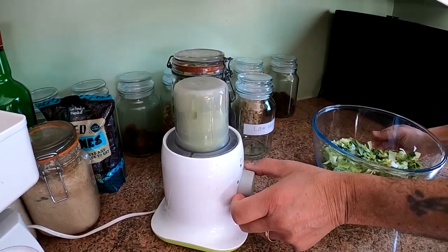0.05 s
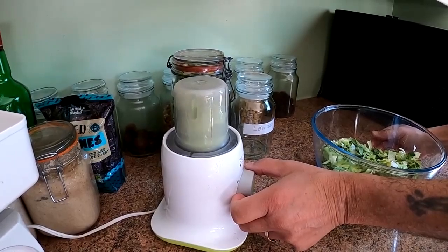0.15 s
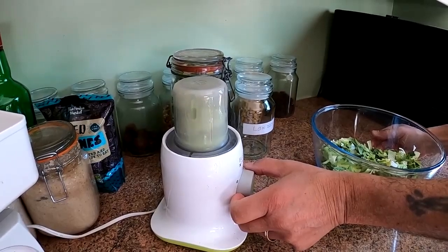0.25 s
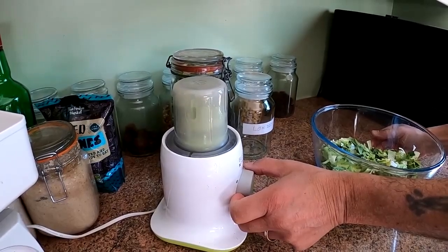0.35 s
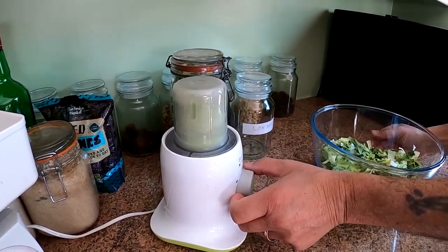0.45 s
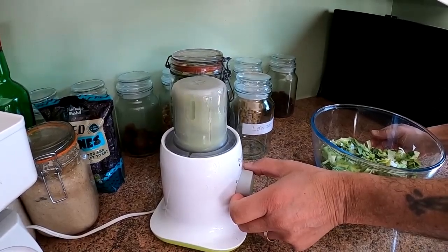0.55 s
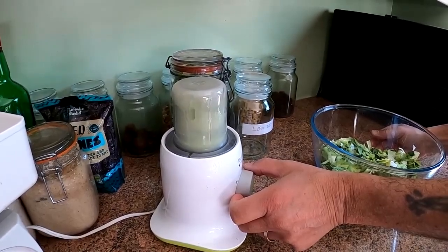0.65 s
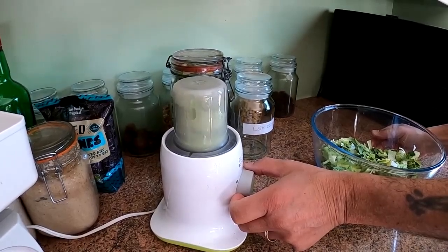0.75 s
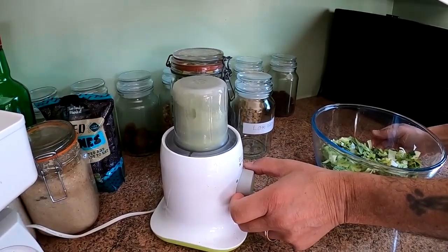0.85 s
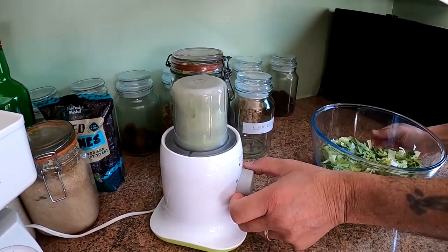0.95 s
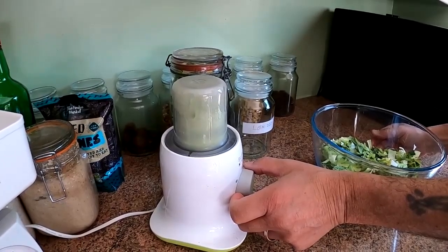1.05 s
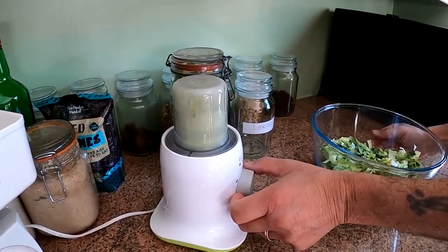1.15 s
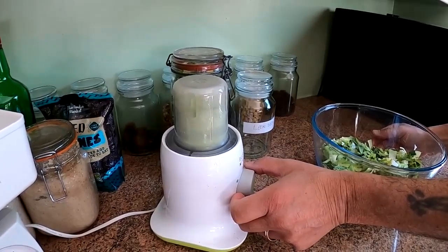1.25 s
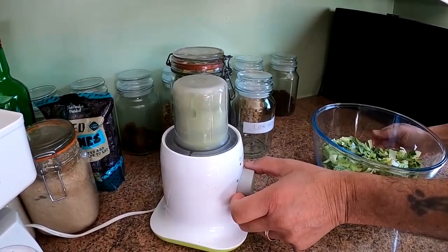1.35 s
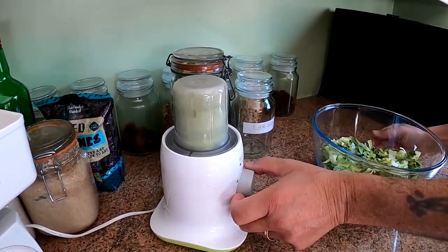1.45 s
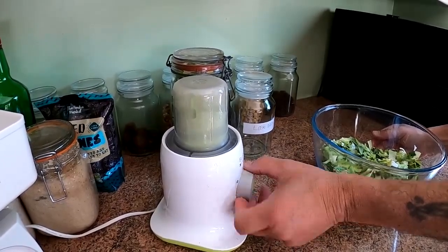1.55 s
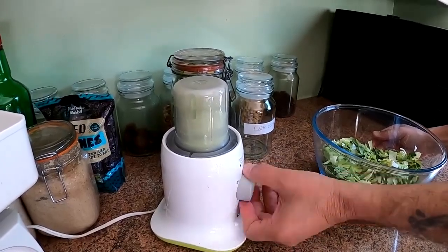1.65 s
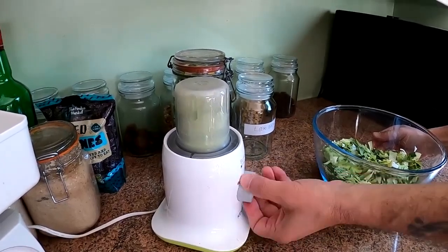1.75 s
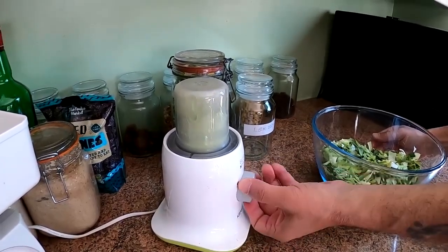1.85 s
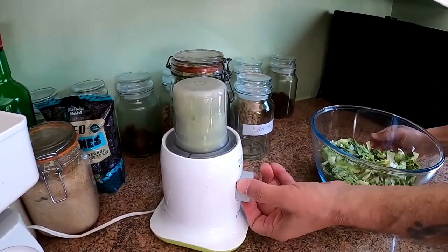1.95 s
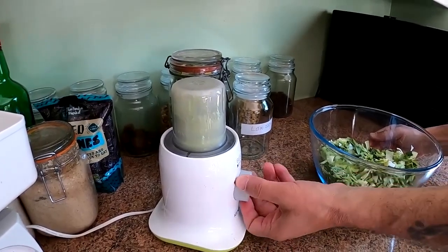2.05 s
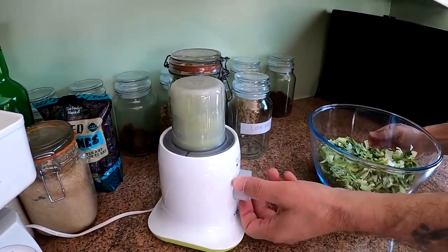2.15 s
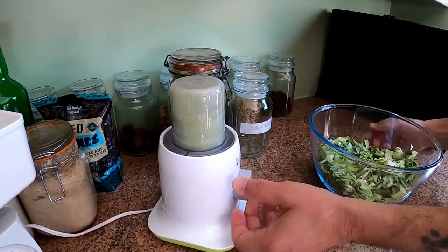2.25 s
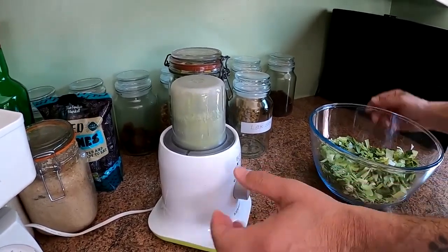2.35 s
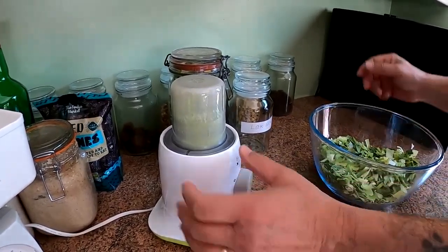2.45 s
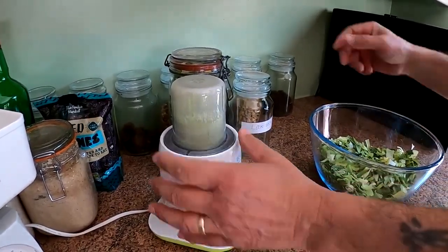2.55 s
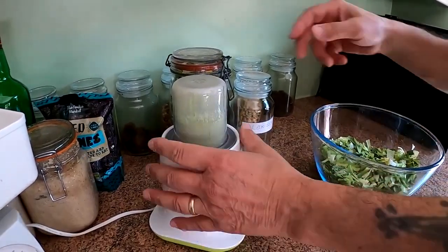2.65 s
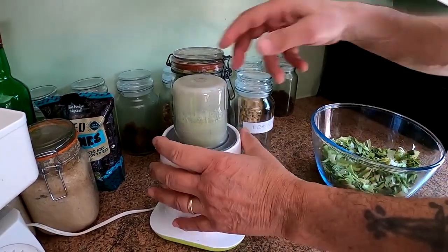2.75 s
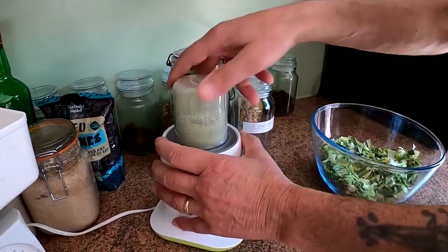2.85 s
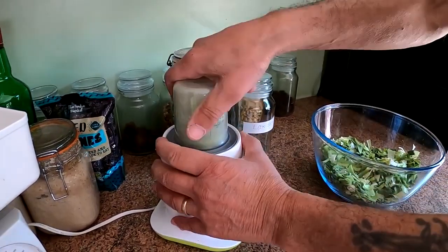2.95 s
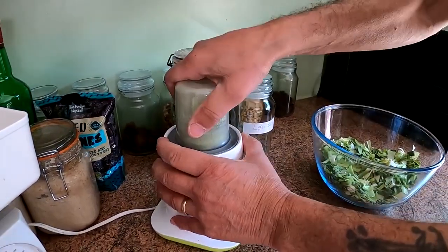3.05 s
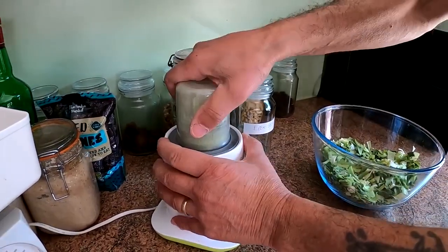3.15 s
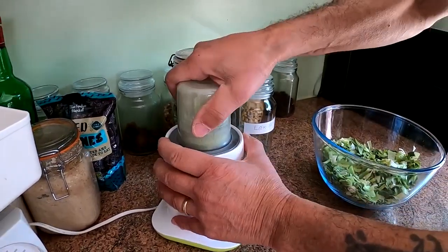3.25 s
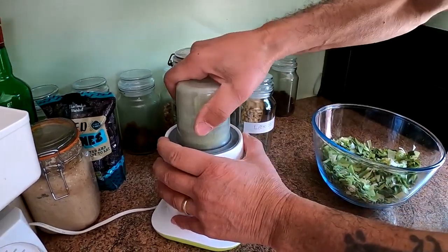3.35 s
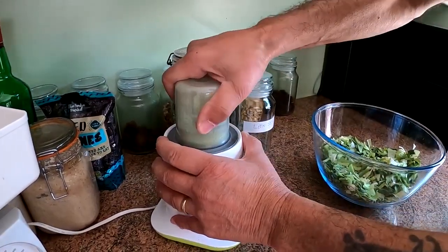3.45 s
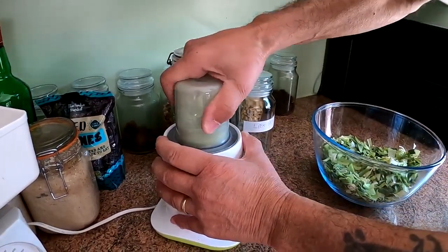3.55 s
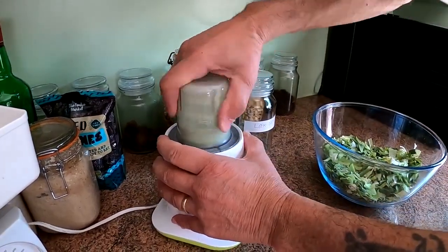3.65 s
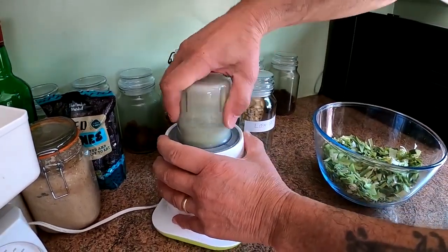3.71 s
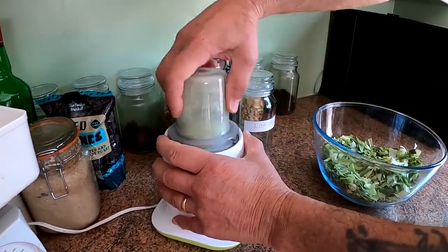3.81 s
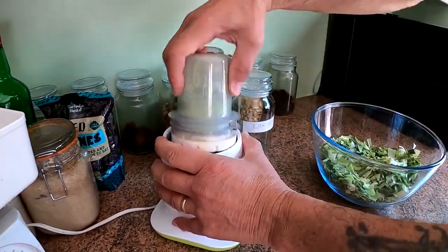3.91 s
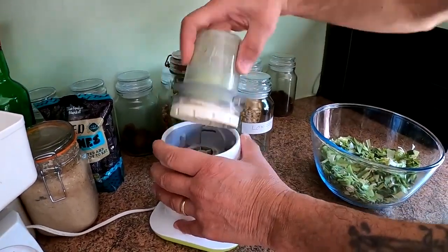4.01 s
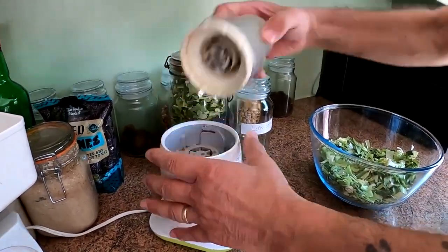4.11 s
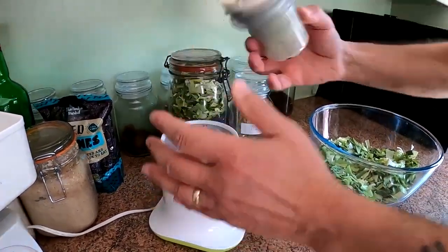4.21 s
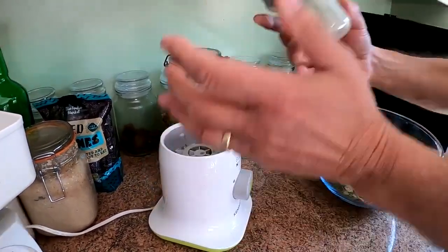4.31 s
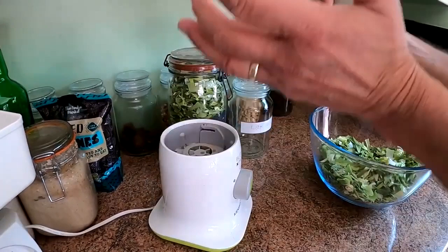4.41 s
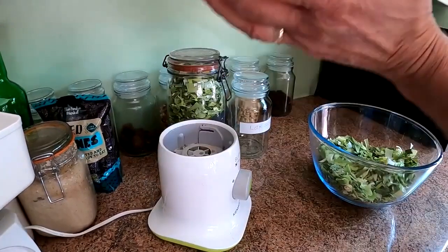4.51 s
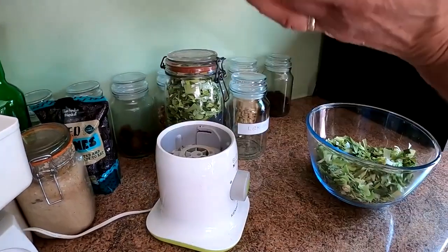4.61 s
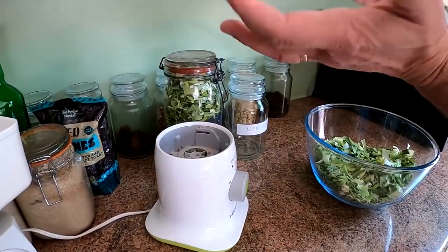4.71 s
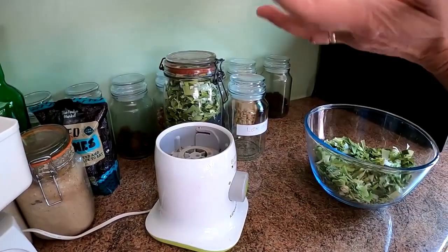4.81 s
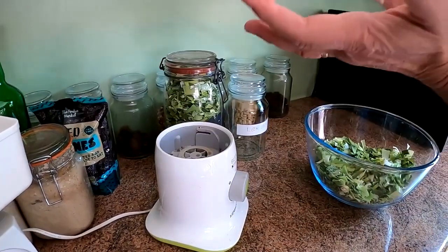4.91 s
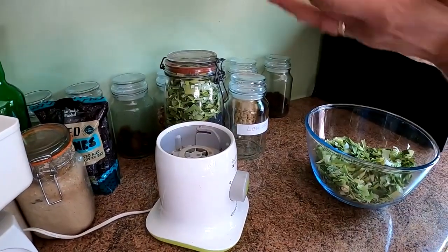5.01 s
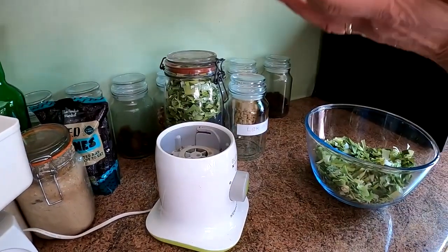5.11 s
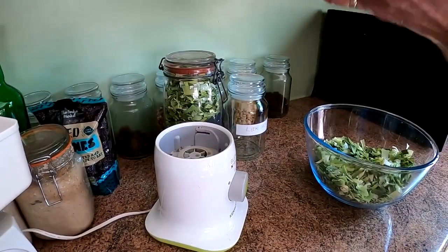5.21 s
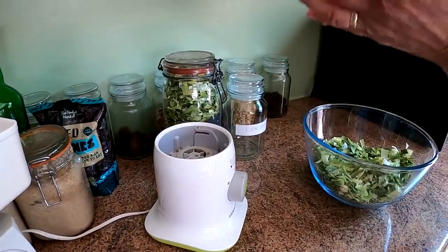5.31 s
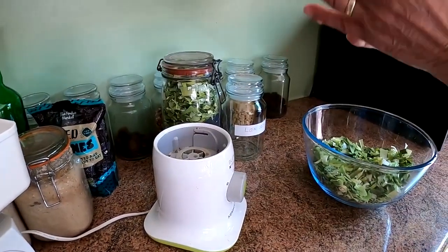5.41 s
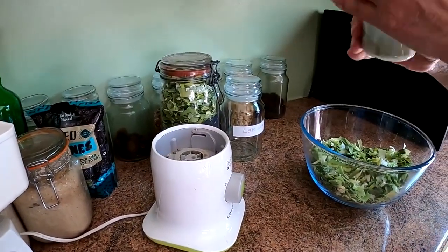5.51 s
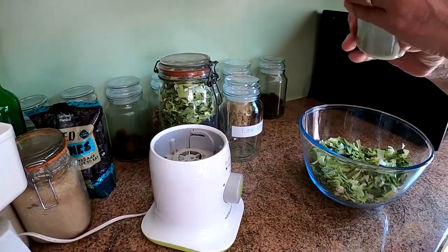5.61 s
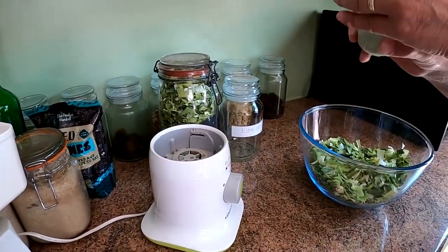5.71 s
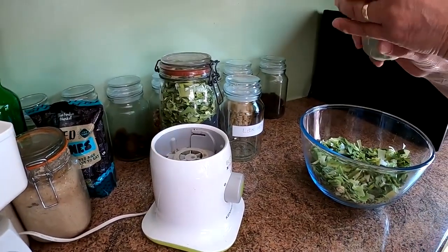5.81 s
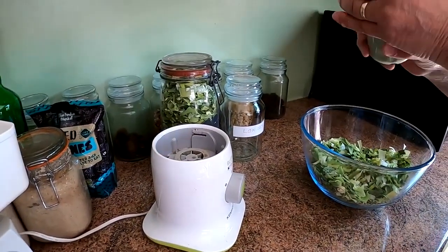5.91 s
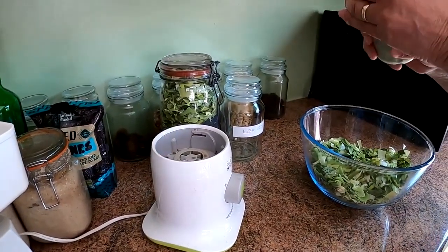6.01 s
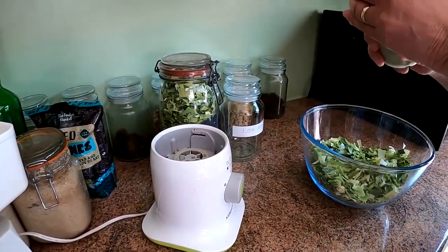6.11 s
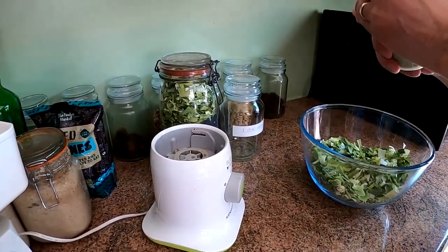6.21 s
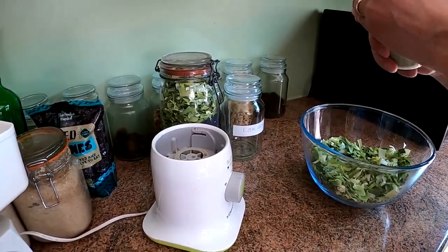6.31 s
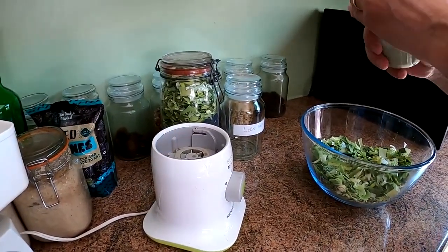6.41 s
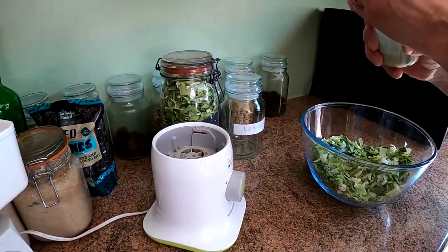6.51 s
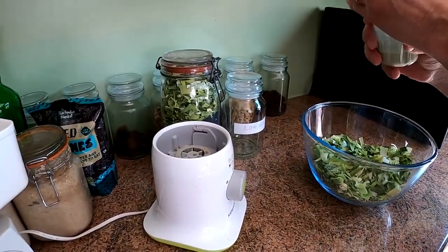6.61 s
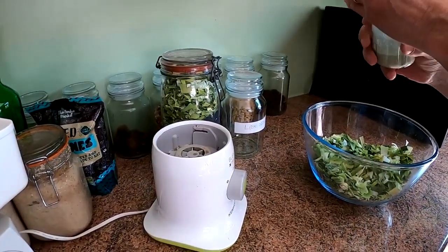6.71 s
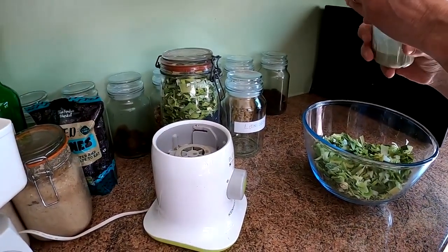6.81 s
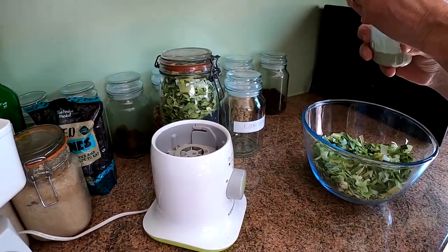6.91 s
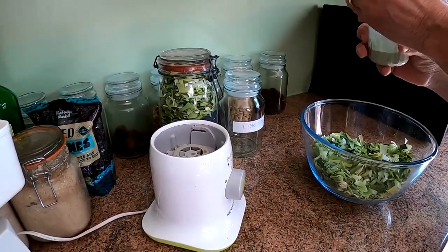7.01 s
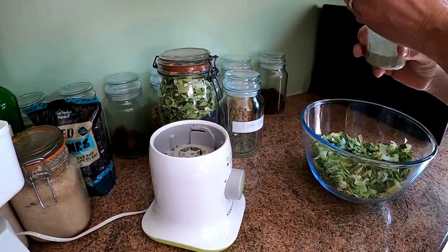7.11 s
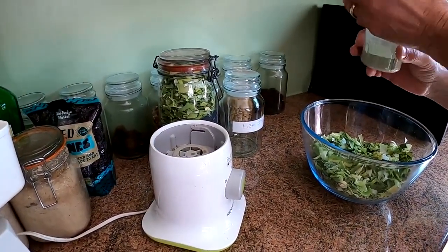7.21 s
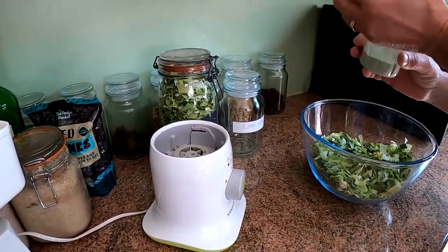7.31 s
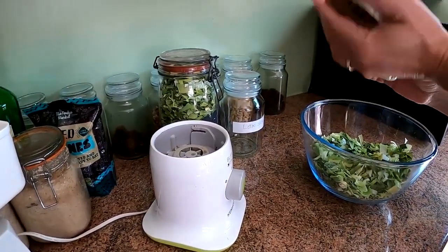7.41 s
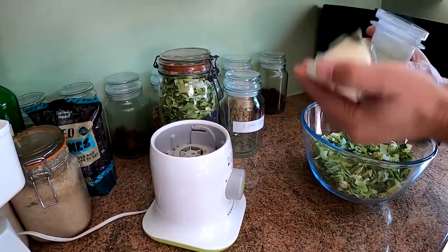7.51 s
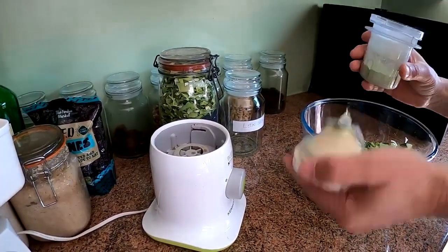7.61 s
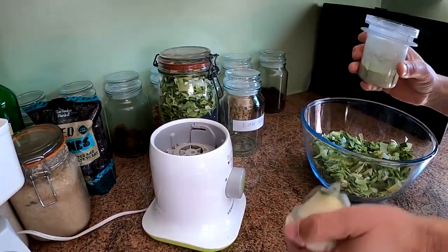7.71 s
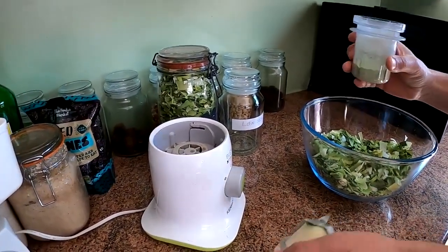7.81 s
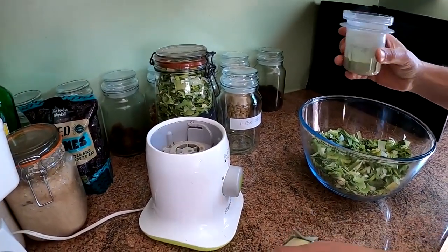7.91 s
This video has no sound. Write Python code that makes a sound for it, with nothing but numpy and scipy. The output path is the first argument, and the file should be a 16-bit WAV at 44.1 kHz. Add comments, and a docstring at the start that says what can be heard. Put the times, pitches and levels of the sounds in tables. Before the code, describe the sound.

A small grinder's harsh, buzzing whirr holds steady, then drops quickly through a fluttering, knocking coast to rest. Hands twist the plastic cup free with clunks, thuds and dragging scuffs. Four crisp, hollow slaps follow at an even pace, then a hard tick, loose lid knocks, one tiny squeak and a rattling pop. Close stereo microphone, short kitchen reflections, very quiet background.

```python
"""A small electric grinder on a kitchen counter runs, is switched off and coasts to rest.
Noise shaped by the housing makes its roar; sines that follow the shaft make its whine, tone and ticks.
Hands twist the plastic cup off the base, slap it against a palm, then unscrew its lid with one squeak.
Noise bursts ringing resonant bodies make the blows; swelling noise makes the scuffs and brushing."""
import sys
import numpy as np
from scipy import signal
from scipy.fft import rfft, irfft, next_fast_len
from scipy.io import wavfile
from scipy.ndimage import uniform_filter1d

SR = 44100
rng = np.random.default_rng(int(sys.argv[2]) if len(sys.argv) > 2 else 0)


def digitize_waveform(pressure):
    """Quantize a signal to 16-bit integers and store it at the path in sys.argv[1].

    Rows of a 2-D input are taken as channels; values are limited to [-1, 1].
    """
    field = np.atleast_2d(pressure).T
    bounded = np.clip(field, -1, 1)
    quanta = np.round(bounded * 32767).astype(np.int16)
    wavfile.write(sys.argv[1], SR, quanta)


N = 351036
TIME_S = np.arange(N) / SR


def amp(db):
    """Decibels to amplitude."""
    return 10 ** (np.asarray(db) / 20)


def even(x):
    """Scale to rms 1."""
    return x / np.sqrt(np.mean(x ** 2) + 1e-20)


def read(points, hz):
    """Read a curve of (Hz, value) points, straight along log frequency."""
    f, value = np.transpose(points)
    return np.interp(np.log(hz + 1), np.log(f + 1), value)


def columns(rows, x):
    """Read every later column along the first one."""
    first, *rest = np.transpose(rows)
    return [np.interp(x, first, column) for column in rest]


def resonance_db(modes, hz):
    """Sum of resonance humps in dB."""
    return sum(db / (1 + (2 * (hz - f) / width) ** 2) for f, width, db in modes)


def drift(cutoff_hz):
    """Slow random wandering of rms 1: lowpassed noise drawn at 400 knots a second."""
    knots = rng.standard_normal(int(N / SR * 400) + 2)
    smooth = signal.lfilter([1], [1, -np.exp(-2 * np.pi * cutoff_hz / 400)], knots)
    return even(np.interp(TIME_S * 400, np.arange(len(knots)), smooth))


def swells(rows):
    """Levels that climb to a peak and fall away at 23.5 dB per rise or fall time, added as powers."""
    power = 0
    for peak_s, db, rise, fall in rows:
        before = (peak_s - TIME_S) / max(rise, .003)
        after = (TIME_S - peak_s) / max(fall, .003)
        power = power + amp(2 * db - 47 * np.maximum(before, after))
    return np.sqrt(power)


# likeness of left and right: pitch_hz, likeness (1 = identical)
LIKENESS = [(60, 1), (180, 1), (500, 0.92), (930, 0.97), (1610, 0.87), (2790, .92), (4830, 1), (8350, 0.65),
            (10500, 0.16), (12500, 0.67), (14400, .8)]
# left against right: pitch_hz, level_db
SIDE_LEAN = [(60, 0.5), (130, 0), (290, -5.5), (630, 0.5), (1380, -2), (3020, 1), (6600, -2), (14400, 1)]


def coloured(envelope, field_db, size):
    """Stereo noise under an envelope, shaped by field_db(hz, s); every frame keeps its power."""
    noise = envelope * rng.standard_normal((2, N))
    hz, s, (a, b) = signal.stft(noise, SR, nperseg=size, noverlap=size * 3 // 4)
    same = np.clip(read(LIKENESS, hz), 0, 1)[:, None]
    half_lean = read(SIDE_LEAN, hz)[:, None] / 2
    gain = amp(field_db(hz[:, None], s))
    gain = gain / np.sqrt(np.mean(gain ** 2, 0))
    right = same * a + np.sqrt(1 - same ** 2) * b
    bins = np.array([a * amp(half_lean), right * amp(-half_lean)]) * gain
    return signal.istft(bins, SR, nperseg=size, noverlap=size * 3 // 4)[1][:, :N]


# how fast the room dies: pitch_hz, t60_s (time to fall 60 dB)
ROOM_T60 = [(100, 0.089), (300, 0.49), (900, 0.33), (2000, 0.37), (5000, 0.33), (8000, .26), (12000, 0.29)]
ROOM_PATCH_DB = 2.2  # rms; reflections come in uneven clumps
ROOM_LIKENESS, ROOM_BEND = 0.73, 1.216  # left-right likeness; above 1 a band holds before it dies


def kitchen(x):
    """Sparse reflections, one in every 20 samples; each band holds briefly, then dies at its own speed."""
    taps = np.zeros((2, SR // 2))
    slots = np.arange(400, SR // 2 - 20, 20)
    at = slots + rng.integers(0, 20, (2, (SR // 2 - 401) // 20))
    np.put_along_axis(taps, at, rng.choice([-1., 1.], at.shape), 1)
    taps[1] = ROOM_LIKENESS * taps[0] + np.sqrt(1 - ROOM_LIKENESS ** 2) * taps[1]
    hz, s, bins = signal.stft(taps, SR, nperseg=256)
    patches = uniform_filter1d(rng.standard_normal(bins.shape[1:]), size=4, axis=0)
    clumps = even(uniform_filter1d(patches, size=5, axis=1))
    fall_db = 60 * (s / read(ROOM_T60, hz)[:, None]) ** ROOM_BEND
    tail = signal.istft(bins * amp(ROOM_PATCH_DB * clumps - fall_db), SR, nperseg=256)[1]
    return signal.fftconvolve(x[None], tail / np.linalg.norm(tail[0]), axes=1)[:, :N]


# roar colour under power and coasting: pitch_hz, density_db (per Hz)
RUNNING_COLOUR = [(18, -69), (30, -45), (200, -13.5), (311, -21), (345, -17), (393, -9), (610, -8),
                  (856, -15.5), (1050, -3.5), (1770, -4.5), (1960, -2.5), (2550, 1.5), (11500, -27.5),
                  (13800, -46), (14900, -66.5)]
COASTING_COLOUR = [(18, -60), (30, -30), (113, -7.5), (150, -12.5), (732, -9), (856, -12.5), (1170, 0.5),
                   (2020, -15), (2900, -9.5), (3570, -10.5), (5410, -24), (9100, -30.5), (13100, -43.5),
                   (14900, -68.5)]
# plastic housing resonances: pitch_hz, width_hz, lift_db
HOUSING = [(105, 18, -3), (199, 68, 11), (636, 28, 6), (1060, 260, 2), (1588, 60, 10), (1756, 190, 7),
           (1960, 80, -4), (2190, 70, -5), (2535, 55, 6.5), (2794, 69, 4.5), (3300, 81, 2.5),
           (3592, 250, 6), (4270, 120, 4.5), (4940, 70, 4), (5600, 110, 5.5), (7700, 300, 0.5)]
# cup resonances that come out as the blade slows: pitch_hz, width_hz, lift_db
LOOSE_CUP = [(1070, 340, 9.5), (3300, 900, 2.5), (8400, 1900, 9.5)]
HOUSING_CALMS = 0.45  # share of the housing ring lost in coasting


def blade_roar(turns, coast, roar_db, loose_db):
    """Noise rings the housing; loose bits tumble in bursts with one throb each turn."""
    tumble = amp(loose_db * (drift(120) + .6 * np.cos(2 * np.pi * turns)))
    tumble = tumble / np.sqrt(uniform_filter1d(tumble ** 2, size=8192))

    def field_db(f, s):
        running, housing = read(RUNNING_COLOUR, f), resonance_db(HOUSING, f)
        coasting = read(COASTING_COLOUR, f) + resonance_db(LOOSE_CUP, f)
        slide = np.interp(s, TIME_S, coast).clip(0, 1.3)
        return running + housing + slide * (coasting - running - HOUSING_CALMS * housing)

    return amp(roar_db) * coloured(tumble, field_db, size=2048)


# blade knocking the housing once a turn: time_s, level_db
KNOCKS = [(0, -34.5), (1.7, -34), (2.0, -30.5), (2.3, -27), (2.45, -30), (2.6, -40), (2.9, -53.5),
          (3.2, -75)]
KNOCK_HZ, KNOCK_WIDTH_HZ = 3230, 1800  # centre and reach of the ring
KNOCK_JITTER_TURNS, KNOCK_SWING_DB = .03, 3  # unevenness in time and strength


def knocks(turns):
    """One click a turn, uneven in time and strength, rings the housing modes."""
    s = np.arange(2048) / SR
    uneven_turns = np.maximum.accumulate(turns + KNOCK_JITTER_TURNS * drift(150))
    clicks = np.diff(np.floor(uneven_turns), prepend=0)
    clicks = clicks * amp(KNOCK_SWING_DB * (0.66 * drift(25) + 0.77 * rng.standard_normal(N)))
    ring = 0
    for f, width, db in HOUSING:
        strength = amp(db) * np.sqrt(width) / (1 + (2 * (f - KNOCK_HZ) / KNOCK_WIDTH_HZ) ** 4)
        ring = ring + strength * np.exp(-np.pi * width * s) * np.sin(2 * np.pi * f * s)
    rung = signal.oaconvolve(uniform_filter1d(clicks, size=3), ring)[:N]
    level = amp(columns(KNOCKS, TIME_S)[0])
    return level * rung / np.sqrt(uniform_filter1d(rung ** 2, size=16384) + 1e-9)


# where the housing lets the brush ticks out: pitch_hz, width_hz, lift_db
TICK_PORTS = [(6100, 2400, 38), (8300, 1600, 27)]
TICKS_PER_TURN, TICK_DB = 10, -62  # level against the roar, before the port lift
TICK_HIDDEN_DB, TICK_CLEAR_HZ = -6, 115  # flying bits muffle the ticks until the shaft is slower than this


def brush_ticks(hz, turns, roar_db, loose_db):
    """Brushes tick on the commutator: in-phase harmonics of the tick rate, let out through the housing."""
    end = round(ROAR[-1][0] * SR)
    orders = TICKS_PER_TURN * np.arange(2, 20)[:, None]
    tick_hz = orders * hz[:end]
    levels = amp(TICK_DB + resonance_db(TICK_PORTS, tick_hz)) * (tick_hz < 12000)
    ticks = np.sum(levels * np.cos(2 * np.pi * orders * turns[:end]), 0)
    muffling_db = .5 + TICK_HIDDEN_DB / (1 + (TICK_CLEAR_HZ / hz) ** 8)
    return np.pad(ticks, (0, N - end)) * amp(muffling_db + roar_db + 1.5 * loose_db + 2.2 * drift(25))


def wobble(width_hz):
    """Phase of a wandering pitch, width_hz rms."""
    return 2 * np.pi * np.cumsum(width_hz * drift(12)) / SR


# powered whine: shaft_multiple (rounded for the pitch), level_db, wobble_hz
WHINE = [(2, -45.5, 6), (3, -34.5, 3.5), (4.03, -44, 10), (5, -35, 20), (6.01, -46, 15), (7, -44, 10),
         (8, -39.5, 12), (9, -44, 10), (10.01, -36.5, 14), (11, -45, 11), (12, -36, 5), (20, -52, 30),
         (40, -74, 14)]
# mains pull on the motor: shaft_multiple, offset_hz, level_db
BUZZ = [(0, 100, -53.5), (0, 197, -43), (1, -100, -47.5), (2, -100, -42.5), (3, -100, -41.5)]


def motor_whine(hz, turns, power, roar_db):
    """Shaft harmonics and mains buzz, each unsteady; the higher whines outlast the switch-off longer."""
    whine = 0
    for k, db, width in WHINE:
        ring_db = .5 * (resonance_db(LOOSE_CUP, k * hz) - resonance_db(LOOSE_CUP, k * RUN_HZ))
        tone = np.sin(2 * np.pi * round(k) * turns + wobble(width))
        whine = whine + amp(db + ring_db) * power ** (1 / k) * tone * amp(2.8 * drift(16))
    for k, offset_hz, db in BUZZ:
        tone = np.sin(2 * np.pi * (k * turns + offset_hz * TIME_S) + wobble(8))
        whine = whine + amp(db) * power * tone * amp(2.8 * drift(16))
    return np.sqrt(2) * amp(roar_db - roar_db[0]) * whine


TONE_DB, TONE_DB_PER_OCTAVE = -32, 10  # the shaft tone sinks with speed
TONE_CUT_HZ, TONE_CUT_POWER = 98, 12  # and fades steeply below the cut
OCTAVE_DB = -10  # second partial against the first, once coasting


def shaft_tone(hz, turns, coast, power):
    """A sine at the shaft speed, less steady in coasting, when its octave joins; a little louder on the right."""
    cut_db = 10 * np.log10(1 + (TONE_CUT_HZ / hz) ** TONE_CUT_POWER)
    tone_db = TONE_DB + TONE_DB_PER_OCTAVE * np.log2(hz / RUN_HZ) - cut_db
    first = amp(tone_db + (0.5 + 4.5 * coast) * drift(9.9)) * np.sin(2 * np.pi * turns + wobble(1.5))
    octave_level = amp(tone_db + OCTAVE_DB + 3.0 * drift(14)) * (1 - power)
    octave = octave_level * np.sin(4 * np.pi * turns + wobble(4.0))
    return np.sqrt(2) * (first + octave) * amp([[-1.], [1.]])


# shaft slowed by air drag and bearing friction: time_s, speed_hz (turns per second)
SPEED = [(0, 351.9), (1.68, 351.9), (1.8, 315), (1.9, 281), (2.0, 246), (2.15, 203), (2.3, 165), (2.4, 142),
         (2.53, 111.6), (2.65, 89.4), (2.85, 54.3), (3.2, 1)]
# blade roar: time_s, level_db
ROAR = [(0, -20), (1.7, -20), (2.2, -22.5), (2.42, -24), (2.55, -29.5), (2.94, -44), (3.02, -44.5),
        (3.2, -67), (3.26, -87), (3.3, -87)]
RUN_HZ, POWER_OFF_S = 351.9, 1.68
POWER_FADE_S = 2.2 / 14  # time constant of the buzz; a whine takes its shaft multiple times as long
COAST_RUNNING, COAST_GAIN, COAST_BEND = .12, 0.88, 1.4  # colour slides to coasting as speed is lost


def grinder():
    """One shaft speed drives blade roar, knocks, brush ticks, motor whine and shaft tone."""
    hz = uniform_filter1d(columns(SPEED, TIME_S)[0], size=2048)
    turns = np.cumsum(hz) / SR
    roar_db = columns(ROAR, TIME_S)[0]
    coast = COAST_RUNNING + COAST_GAIN * abs(1 - hz / RUN_HZ) ** COAST_BEND
    power = np.exp(-np.maximum(TIME_S - POWER_OFF_S, 0) / POWER_FADE_S)
    loose_db = 0.93 + 2.3 * (1 - hz / hz[0]) ** 2  # bursts stand apart as the blade slows
    alive = np.clip((ROAR[-1][0] - TIME_S) / 0.081, 0, 1)
    roar = blade_roar(turns, coast, roar_db, loose_db) + knocks(turns)
    roar = roar + amp(-9.5) * kitchen(roar.mean(0))
    ticks = brush_ticks(hz, turns, roar_db, loose_db)
    whine = motor_whine(hz, turns, power, roar_db)
    return alive * (roar + ticks + whine + shaft_tone(hz, turns, coast, power))


# hands brushing about: peak_s, level_db, rise_s, fall_s (per 23.5 dB)
BRUSHES = [(3.0, -53, 2, 0.22), (3.95, -57, .5, 0), (4.3, -67.5, 0.5, 0.5), (4.52, -61, 0.14, 0.02),
           (5.02, -61.5, 0.5, 0), (5.21, -63, 0.5, 0.5), (5.9, -64, .5, 1.1), (6.27, -54.5, -0.5, 0.1),
           (6.4, -72, 2.5, 0.5), (6.65, -53, -0.66, 0.18), (7.3, -68, .15, .5), (7.45, -68, .5, 0.1),
           (7.7, -70.5, .3, 1.2), (7.88, -62.5, 0.14, .12), (7.955, -56, .06, 2)]
# brushing hiss: pitch_hz, density_db (per Hz)
BRUSH_COLOUR = [(350, -39), (600, -8.5), (840, -13.5), (1270, -3), (1400, -7.5), (1580, -4.5), (7210, -5),
                (14900, -24)]
# low bumps through the counter: peak_s, level_db, rise_s, fall_s (per 23.5 dB)
BUMPS = [(3.0, -56.5, 2, 0.5), (3.9, -52, 0.5, 0.53), (4.3, -63.5, 0.5, 0.3), (4.92, -53, 0.2, 0.07),
         (5.21, -52, 0.2, -0.06), (6.57, -57, .03, 0.03)]
# counter rumble: pitch_hz, density_db (per Hz)
RUMBLE_COLOUR = [(12, -31), (20, -3.5), (40, -3.5), (98, -31.5), (138, -16), (171, -2.5), (266, -7),
                 (345, -15), (441, -19.5), (1000, -32), (1300, -60), (2200, -120)]
# thin airy hiss as the cup is lifted away: peak_s, level_db, rise_s, fall_s (per 23.5 dB)
CUP_LIFTS = [(4.13, -72.5, 0.13, .1), (4.24, -62, .1, .1), (4.34, -68.5, .15, .12)]
# band of that hiss: pitch_hz, width_hz, lift_db
CUP_LIFT_BAND = [(4020, 900, 22)]
HISS_DB, RUMBLE_DB = -84.5, -69  # the quiet kitchen
HANDS_PAN_DB = -3  # left against right


def hands():
    """Faint uneven hiss, low lumpy rumble and an airy lift: wandering noise under swells."""
    hiss = coloured(amp(0.85 * drift(30)), lambda f, s: read(BRUSH_COLOUR, f), size=512)
    rumble_db = lambda f, s: read(RUMBLE_COLOUR, f) - 60 * (f > 1000)
    rumble = coloured(amp(1.5 * drift(15)), rumble_db, size=2048)
    airy = coloured(amp(1.5 * drift(30)), lambda f, s: resonance_db(CUP_LIFT_BAND, f), size=512)
    mix = np.hypot(amp(HISS_DB), swells(BRUSHES)) * hiss
    mix = mix + np.hypot(amp(RUMBLE_DB), swells(BUMPS)) * rumble + swells(CUP_LIFTS) * airy
    return mix * amp([[HANDS_PAN_DB / 2], [-HANDS_PAN_DB / 2]])


# Every body below holds three parts. Colour: pitch_hz, level_db.
# Modes: pitch_hz, width_hz, lift_db. Thump: pitch_hz, t60_s.
# Every landing below: rise_s (0.0001 at least), thump_db against the peak, echo_db, left_right_db.
# The direct thump is doubled on top of its level.
GRIP_SHIFT = .012  # the grip moves the modes by this share (rms) from blow to blow


def minimum_phase(db):
    """Spectrum with the given level whose ring starts at once."""
    log_gain = np.log(amp(db))
    return np.exp(log_gain - 1j * signal.hilbert(log_gain).imag)


def blows(rows, body, landing, spread=.7):
    """A short scrape of noise rings the body, with a soft thump. Gives left, right and what the walls get."""
    colour, modes, (thump_hz, thump_t60) = body
    rise, thump_db, echo_db, pan_db = landing
    hz, t = abs(np.fft.fftfreq(8192, 1 / SR)), np.arange(8192) / SR
    out = np.zeros((3, N + 8192))
    for s, peak_db, tilt_db, contact in rows:
        grip, scrape = rng.standard_normal(), rng.standard_normal(8192)
        broad_db = read(colour, hz) + tilt_db * np.log2(np.maximum(hz, 1200) / 2000)
        ring_db = resonance_db(modes, hz * (1 + GRIP_SHIFT * grip))
        scrape = scrape * (1 - np.exp(-t / max(rise, .0001))) * amp(-60 * t / max(contact, .002))
        click = np.fft.ifft(np.fft.fft(scrape) * minimum_phase(broad_db + ring_db)).real
        # the loudest 2 ms sets the peak level
        click = amp(peak_db) * click / np.sqrt(uniform_filter1d(click ** 2, size=88).max())
        # summed over all directions, a spread below 1 makes the modes stand out less
        wide = np.fft.ifft(minimum_phase(broad_db + spread * ring_db)).real
        wide = wide * np.linalg.norm(click) / np.linalg.norm(wide)
        thump = amp(peak_db + thump_db - 60 * t / thump_t60) * np.sin(2 * np.pi * thump_hz * t)
        thump = thump * (1 - np.exp(-t / 0.00084))
        sound = np.array([click, click, wide]) + thump * [[2], [2], [.7]]
        at = round(s * SR)
        out[:, at:at + 8192] += sound * amp([[pan_db / 2], [-pan_db / 2], [echo_db]])
    return out[:, :N]


# hard bits hit by the slowing blade: start_s, peak_db, brightness_db (per octave), contact_s (60 dB fall)
RATTLES = [(2.287, -24, 2, .012), (2.42, -25, 1.5, .012), (2.452, -24.5, 2.5, .012), (2.51, -27.5, 2, .012),
           (2.553, -25, 1, 0.013), (2.583, -30, -6, 0.011), (2.677, -34, 0, .012),
           (2.905, -42.5, -0.5, .015), (2.984, -32.5, -4, .018), (3.065, -49, -6, .015),
           (3.115, -49, -10, .015), (3.17, -59, -6, 0.015)]
# body: the housing's shell
SHELL = ([(180, -40), (900, -13.5), (1100, -3.5), (2000, -6), (2800, -0.5), (4200, -8.5), (7000, -28),
          (14900, -59.5)], HOUSING, (148, .04))
# landing of a rattle
RATTLING = (-0.05, -39.5, -10.5, -1)


def rattles():
    """Hard bits knocked about by the blade ring the shell."""
    return blows(RATTLES, SHELL, RATTLING)


# cup twisted off the base: start_s, peak_db, brightness_db (per octave), contact_s (60 dB fall)
TWISTS = [(3.338, -51, -9, 0.02), (3.387, -53.5, -18, 0.027), (3.408, -51.5, -14, 0.015),
          (3.453, -52, -9, 0.024), (3.475, -47.5, -1, .032), (3.519, -36, -3.5, .029),
          (3.553, -53, -14.5, .02), (3.59, -57, -3, .018), (3.617, -43.5, 0, .044), (3.627, -31.5, 5, .04),
          (3.636, -30, 3.5, 0.05), (3.742, -44, 1, .04), (3.753, -24, 1, .039), (3.761, -23, -3.5, 0.028),
          (3.816, -26, -1.5, 0.025), (3.857, -41, -2, .05), (3.868, -40, -6, .04), (3.905, -40, -1, .05),
          (3.936, -30, -5, .016), (3.946, -34, -2, .03), (3.961, -28.5, -8, 0.035), (3.97, -25.5, 3, 0.026),
          (4.018, -41.5, -7, .026), (4.043, -53, -8, .02), (4.185, -37.5, 0.5, .022)]
# body: the base
BASE = ([(180, -10), (300, -2.5), (577, -10.5), (882, -13), (1110, -2), (2000, -8), (4230, -8),
         (8690, -20.5), (14900, -54)], [(1067, 220, 6.5), (1710, 180, 5), (2745, 550, 5.5),
         (4200, 440, 4.5)], (160, 0.25))
# landing of a twist
TWISTING = (0.1, -25.5, -12, -1.5)


def twists():
    """The cup is twisted off, each contact ringing the base."""
    return blows(TWISTS, BASE, TWISTING)


# soft thuds of plastic on plastic: start_s, level_db, pitch_hz
THUDS = [(3.756, -33.5, 257), (3.767, -30, 101.3), (3.8, -39.5, 105), (3.825, -37, 269.7),
         (3.874, -36, 102.7), (3.916, -32, 283.4), (3.921, -38, 100), (3.965, -35.5, 105),
         (4.021, -41.5, 294.4), (4.04, -41, 114.7), (4.189, -48.5, 258), (6.55, -33.5, 170.4)]
THUD_T60_S, THUD_RISE_S = 0.13, 0.0018


def thuds():
    """Short dying low tones."""
    t, out = np.arange(8192) / SR, np.zeros(N)
    for s, db, hz in THUDS:
        at = round(s * SR)
        envelope = amp(db - 60 * t / THUD_T60_S) * (1 - np.exp(-t / THUD_RISE_S))
        out[at:at + 8192] += envelope * np.sin(2 * np.pi * hz * t)
    return out


# cup dragged on its base: peak_s, level_db, fall_s (per 23.5 dB)
CUP_SCUFFS = [(3.763, -30, 0.06), (3.83, -39.5, 0.17), (3.87, -41, .1), (3.9, -37.5, 0.08),
              (3.928, -29, -0.02), (3.995, -43, -0.03), (4.04, -54, 0)]
# cup scuff: pitch_hz, density_db (per Hz)
CUP_SCUFF_COLOUR = [(24, -45.5), (40, -17.5), (98, 3.5), (135, -22.5), (266, 1), (430, -1), (600, -11.5),
                    (850, -15), (1100, -8.5), (1500, -10.5), (1950, -42.5), (3300, -120)]
# lid rattling on its thread: peak_s, level_db, fall_s (per 23.5 dB)
LID_SCUFFS = [(6.618, -36, 0.1), (6.66, -43, 0.08), (6.715, -47, 0.09), (6.745, -51, 0.07),
              (6.79, -50.5, 0.06), (6.81, -51.5, 0.09), (6.84, -57, 0.1)]
# lid scuff: pitch_hz, density_db (per Hz)
LID_SCUFF_COLOUR = [(40, -30), (100, -10), (210, -10.5), (290, -3.5), (380, -11), (450, 1), (580, -10),
                    (780, -5), (990, -15), (1330, -3), (1900, -15), (3300, -80)]
SCUFF_RISE_S = .012  # per 23.5 dB


def drag(rows, colour):
    """Bumpy coloured noise that swells with each drag."""
    level = swells([(s, db, SCUFF_RISE_S, fall) for s, db, fall in rows])
    return level * coloured(amp(2.4 * drift(48)) / 1.1, lambda f, s: read(colour, f), size=1024)


def scuffs():
    """Low scraping while plastic drags: the cup on its base, the lid on its thread."""
    return drag(CUP_SCUFFS, CUP_SCUFF_COLOUR) + drag(LID_SCUFFS, LID_SCUFF_COLOUR)


# dull palm touch before a slap: start_s, peak_db, brightness_db (per octave), contact_s (60 dB fall)
TOUCHES = [(4.688, -47.5, 0, 0.05), (4.892, -35.5, 0, 0.04), (5.097, -37, 0, 0.04),
           (5.357, -37, 0.5, 0.045)]
# body: the palm
PALM = ([(100, -30), (300, -14), (700, -5.5), (1300, 0.5), (1600, -19.5), (3000, -36), (14900, -80)],
         [(1200, 200, 3)], (150, 0.0399))
# cup slapped on a palm, with a small bounce: start_s, peak_db, brightness_db (per octave), contact_s
SLAPS = [(4.708, -41, -6.5, 0.014), (4.718, -33.5, -2.5, 0.021), (4.729, -10.5, -0.3, 0.019),
         (4.737, -24, -6, 0.022), (4.93, -42.5, -5, .02), (4.941, -10, -1.5, 0.019),
         (4.948, -23, -5.5, 0.02), (5.157, -12, -1.1, 0.023), (5.165, -25.5, -6, .025),
         (5.394, -18, 3.5, 0.021), (5.397, -15, -1.5, .022)]
# body: the cup
CUP = ([(180, -47.5), (300, -24.5), (567, -26), (942, -7), (1300, -4.5), (2000, -4), (3160, -7),
        (3840, -8.5), (7880, -23.5), (14900, -50.5)], [(1110, 150, 3), (1520, 100, 3), (1830, 170, 8.7),
        (2359, 320, 5), (2560, 150, 4), (2895, 200, 3), (3480, 280, 4.4), (3880, 130, 6), (4160, 160, 4.7),
        (5100, 150, 3.1)], (148, 0.034))
# landing of a touch or slap
SLAPPING = (-0.1, -16.5, -8.5, -2.5)


def slaps():
    """The palm touches the cup dully, then the slap rings it."""
    return blows(TOUCHES, PALM, SLAPPING) + blows(SLAPS, CUP, SLAPPING)


# something hard ticking on the cup: start_s, peak_db, brightness_db (per octave), contact_s (60 dB fall)
CUP_TICKS = [(5.674, -22.5, 1, 0.026), (5.683, -31, -0.5, 0.024)]
# body: the cup's rim
RIM = ([(180, -71.5), (300, -48), (1460, -8.5), (1780, -4), (3000, -17.5), (4670, -10), (12700, -40),
        (14900, -67.5)], [(1905, 180, 5), (4700, 110, 9.6), (4910, 120, 12), (6400, 550, 9.5),
        (8300, 505, 3.9)], (120, 0.043))
# landing of a tick
TICKING = (-0.4, -45, -11, -4)


def cup_ticks():
    """Something hard rings the rim, with its modes at full strength in the room too."""
    return blows(CUP_TICKS, RIM, TICKING, spread=1.0)


# lid worked loose: start_s, peak_db, brightness_db (per octave), contact_s (60 dB fall)
LID = [(5.915, -57, 6, 0.02), (6.032, -43, -8, 0.029), (6.046, -25.5, 3.5, 0.035), (6.067, -33.5, -5, 0.03),
       (6.081, -34, -0.5, 0.019), (6.09, -38, -1, 0.039), (6.287, -32, -2.5, 0.043),
       (6.378, -21.5, -4.5, 0.026), (6.385, -31, -5.5, 0.019), (6.398, -35, -6, 0.024),
       (6.597, -49.5, 1, 0.034), (6.608, -19.5, 1, .068), (6.638, -32.5, 1.5, 0.04), (6.71, -45, -14, .02),
       (6.788, -52, 4, .02), (6.804, -46.5, -6, .072), (6.97, -58.5, -4.5, 0.017)]
# body: the lid
CAP = ([(180, -26.5), (300, -16), (989, -7), (1370, 0.5), (2200, 0.5), (3050, 0.5), (9280, -21),
        (13300, -51), (14900, -74)], [(1405, 240, 7.8), (1770, 340, 3.1), (2400, 180, 4.5),
        (2940, 100, 2.7), (4770, 280, 6.3)], (175, 0.11))
# landing of a lid knock
UNSCREWING = (-0.04, -33, -13.5, -3)


def lid_knocks():
    """The lid knocks as it is worked loose, ringing itself."""
    return blows(LID, CAP, UNSCREWING)


# lid thread sticking and slipping: time_s, slip_rate_hz, level_db
SQUEAK = [(6.29, 1303, -45), (6.302, 1347, -37), (6.311, 1368, -25.5), (6.322, 1415, -36),
          (6.333, 1404, -26), (6.347, 1560, -19.5), (6.352, 1520, -30.5), (6.358, 1510, -33),
          (6.363, 1503, -43.5), (6.378, 1477, -41.5)]
# squeak partials: slip_multiple, level_db, share of the level swing, roughness
SQUEAK_TONES = [(1, -3, 0.95, 0.1), (1.92, -26, 0.55, .75), (2.8, -40, 0.37, 1.0), (3.75, -52, .35, 1.1)]


def squeak():
    """Slips of the lid thread, unsteady in rate; rough upper partials. Gives left, right and walls."""
    hz, level_db = columns(SQUEAK, TIME_S)
    slips = np.cumsum(hz * (1 + .018 * drift(150))) / SR
    on = np.clip(np.minimum(TIME_S - SQUEAK[0][0], SQUEAK[-1][0] - TIME_S) / .003, 0, 1)
    tones = 0
    for k, db, swing, rough in SQUEAK_TONES:
        grit = even(uniform_filter1d(uniform_filter1d(rng.standard_normal(N), size=60), size=60))
        level = amp(db + swing * level_db) * (1 + rough * grit) / np.hypot(1, rough)
        tones = tones + level * np.sin(2 * np.pi * k * slips)
    return on * np.sqrt(2) * tones * amp([[-1.], [1.], [-20.]])


def scene():
    """Grinder, hands, scuffs and thuds, with the blows and squeak sounding in the kitchen."""
    groups = [rattles() + twists() + cup_ticks(), slaps(), lid_knocks() + squeak()]
    in_room = sum(group[:2] + kitchen(group[2]) for group in groups)
    return grinder() + hands() + scuffs() + thuds() + in_room


# phase by which left leads: pitch_hz, lead_rad
LEFT_LEAD = [(0, -0.73), (600, 0.22), (1030, .25), (1700, -0.6), (2580, -0.69), (4820, -0.72), (6550, -1.7),
             (7150, -1.9), (8440, -0.17), (14600, -.1)]
EDGE_HZ = 14900  # upper band limit


def record(dry):
    """Turn the left phase against the right by frequency, then limit the band."""
    size = next_fast_len(N)
    lead = columns(LEFT_LEAD, np.fft.rfftfreq(size, 1 / SR))[0]
    left = irfft(rfft(dry[0], size) * np.exp(1j * lead), size)[:N]
    lowpass = signal.firwin(511, EDGE_HZ, window=("kaiser", 9), fs=SR)
    return signal.oaconvolve([left, dry[1]], lowpass[None], "same")


dry = scene()
out = record(dry)
digitize_waveform(out)
```